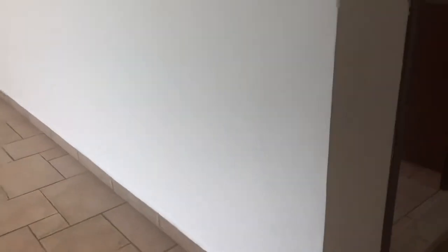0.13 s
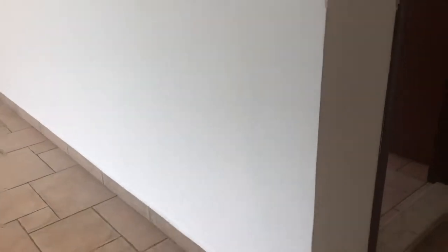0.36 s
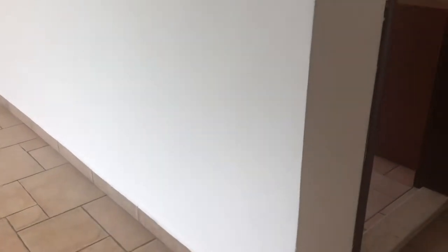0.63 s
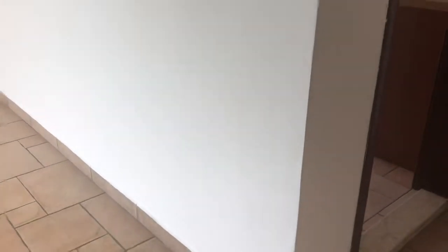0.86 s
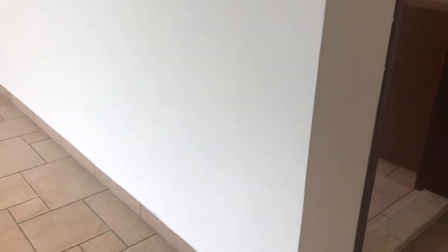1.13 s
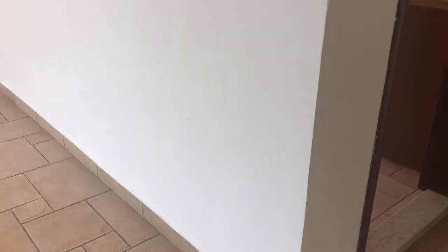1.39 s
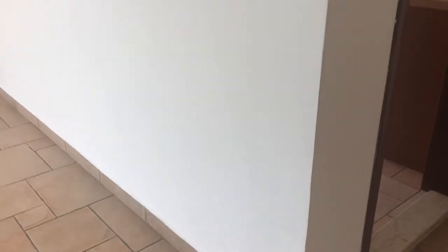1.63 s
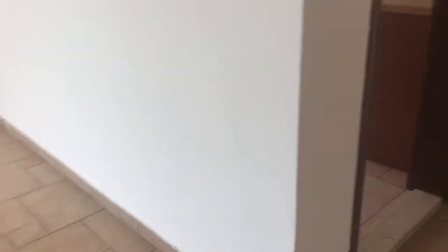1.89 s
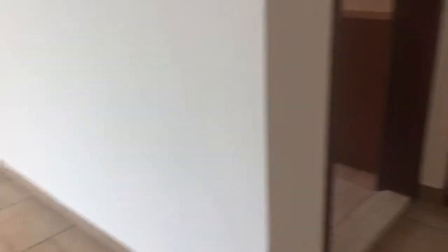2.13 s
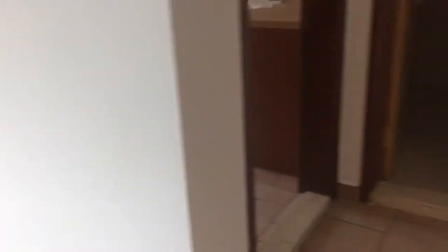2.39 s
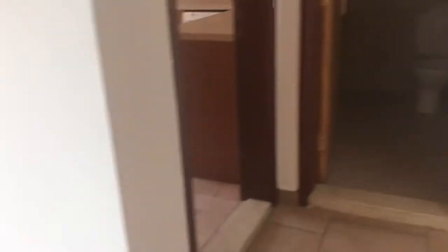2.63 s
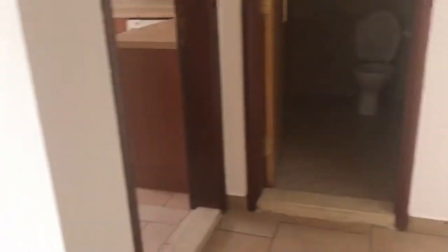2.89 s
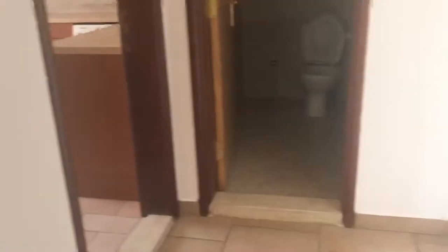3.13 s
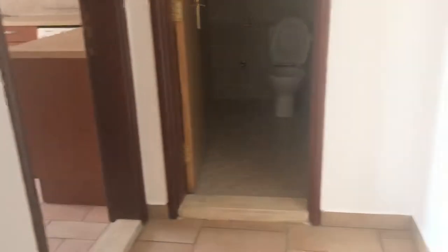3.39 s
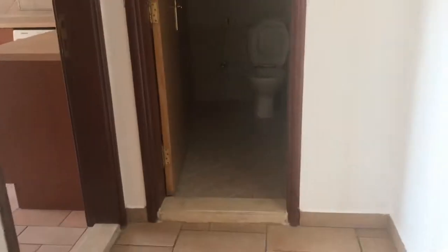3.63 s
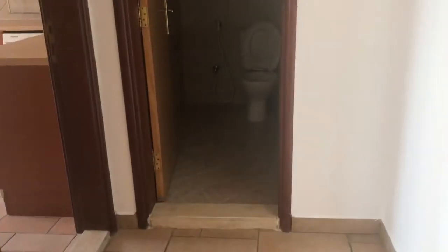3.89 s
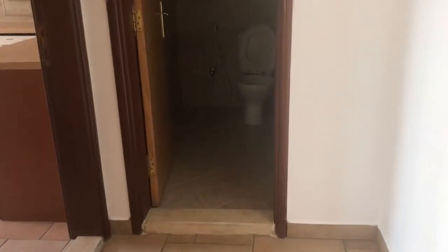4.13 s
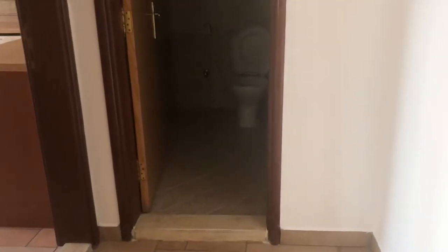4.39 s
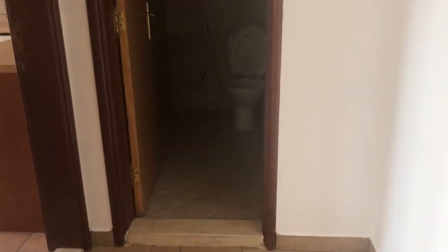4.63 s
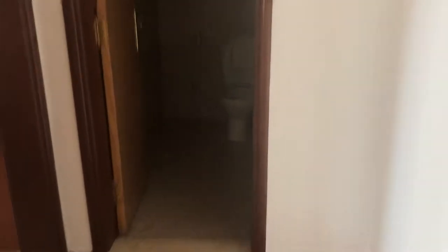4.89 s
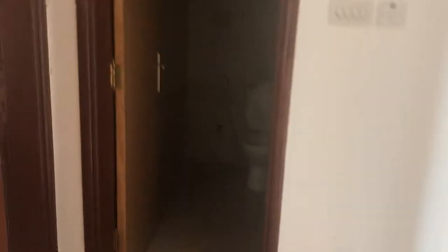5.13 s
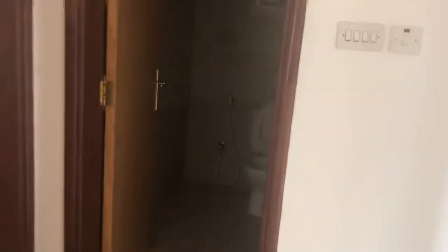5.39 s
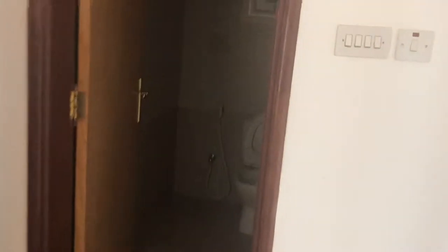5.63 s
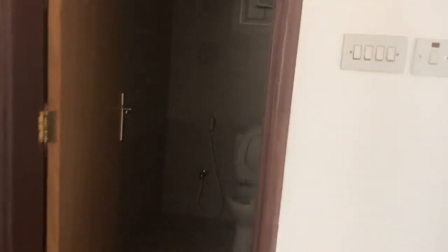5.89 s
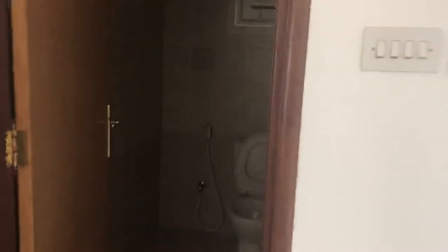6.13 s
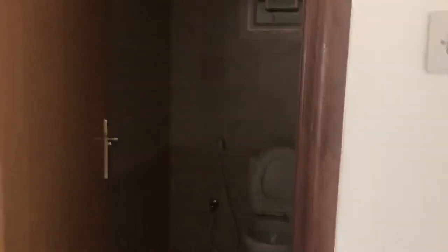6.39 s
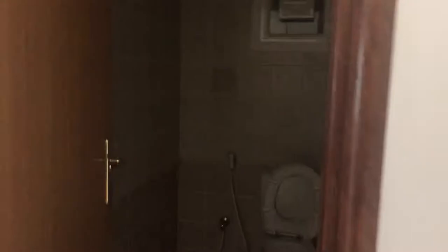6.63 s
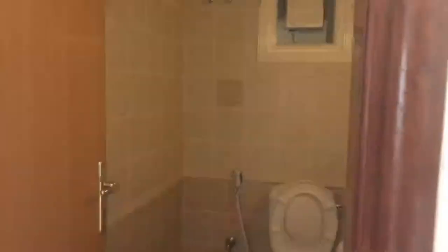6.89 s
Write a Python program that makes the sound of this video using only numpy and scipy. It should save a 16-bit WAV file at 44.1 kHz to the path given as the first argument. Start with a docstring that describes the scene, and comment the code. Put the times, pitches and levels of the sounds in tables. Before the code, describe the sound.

Shoes tap and cloth rustles in an empty tiled apartment; a distant door slams with a booming echo, then a switch snaps loudly close by.

```python
"""Someone walks through an empty tiled apartment, with outdoor noise coming faintly through the walls.
Clothes rustle and shoes tap, a sole drags over tile, and metal clinks: noise grains, short bursts, rings.
A door a few rooms away touches its frame, then slams; panel modes and noisy cracks boom through bare rooms.
A deep rumble of band noise grows, a few more taps, clinks and rustles follow, and a wall switch snaps
close by."""
import sys
import numpy as np
from scipy import signal
from scipy.fft import irfft
from scipy.io import wavfile
from scipy.ndimage import uniform_filter1d

SR = 44100
rng = np.random.default_rng(int(sys.argv[2]) if len(sys.argv) > 2 else 0)


def how_loud(loudness_db):
    """Turn decibels into a plain amplitude multiplier (0 dB gives 1, 20 dB gives 10)."""
    steps = np.asarray(loudness_db, float) / 20
    return 10 ** steps


def inscribe(sig):
    """Save sig as 16-bit PCM at rate SR to the path in sys.argv[1].

    A 1-D sig is mono; a 2-D sig holds one channel per row.
    Samples are clipped to [-1, 1] before scaling.
    """
    pcm = np.round(np.clip(np.atleast_2d(sig).T, -1, 1) * 32767)
    wavfile.write(sys.argv[1], SR, pcm.astype(np.int16))


N = 309582


def evened(x):
    """Scales to rms 1."""
    return x / np.sqrt(np.mean(x ** 2) + 1e-20)


def read(points, hz):
    """Reads a table on a log-frequency axis."""
    f, value = np.transpose(points)
    return np.interp(np.log(hz + 1), np.log(f + 1), value)


def curve(rows):
    """A dB curve as gain over the whole scene, silent outside its span."""
    s, db = np.transpose(rows)
    return how_loud(np.interp(np.arange(N) / SR, s, db, left=-200, right=-200))


def add(mix, s, sound):
    """Mixes a sound in at time s."""
    part = mix[round(s * SR):][:len(sound)]
    part += sound[:len(part)]


def colour(x, spectrum, size=4096):
    """Causal minimum-phase filter with the given spectrum."""
    log_gain = np.log(how_loud(read(spectrum, abs(np.fft.fftfreq(size, 1 / SR)))))
    response = np.fft.ifft(np.exp(np.conj(signal.hilbert(log_gain)))).real[:size // 2]
    return signal.oaconvolve(x, response)[:len(x)]


def resonate(x, hz, width):
    """One resonance of gain 1."""
    pole = np.exp((2j * np.pi * hz - np.pi * width) / SR)
    return 2 * signal.lfilter([1 - abs(pole)], [1, -pole], x).real


def ring(modes, seconds, rise_turns):
    """Dying sines with a short, softened onset, slower for low modes; peak 1."""
    t = np.arange(round(seconds * SR)) / SR
    out = np.zeros(len(t))
    for hz, db, t60 in modes:
        onset = 1 - np.exp(-t * hz / rise_turns)
        out += how_loud(db - 60 * t / t60) * onset * np.sin(2 * np.pi * hz * t)
    return out / abs(out).max()


def puff(t60, size=4096):
    """A sudden noise burst with an even spectrum: each pitch region arrives after its own short delay."""
    spread_s = t60 / np.log(1000)
    region = max(round(.4 * size / SR / spread_s), 1)
    a, b = evened(uniform_filter1d(rng.standard_normal((size // 2 + 1, 2)), region, 0)).T
    delay_s = spread_s * (a ** 2 + b ** 2) / 2
    phase = 2 * np.pi * np.cumsum(delay_s) * SR / size
    return irfft(np.exp(-1j * phase))[:size // 2]


def room(x, decays, seconds, build_ms):
    """Diffuse echoes that build up and die band by band, energy 1."""
    n = round(seconds * SR)
    hz, t, z = signal.stft(rng.standard_normal(n), SR, nperseg=512)
    decay = how_loud(-60 * t / read(decays, hz)[:, None])
    tail = signal.istft(z * decay, SR, nperseg=512)[1][:n]
    tail *= 1 - np.exp(-np.arange(len(tail)) / SR * 1000 / build_ms)
    return signal.oaconvolve(x, tail / np.linalg.norm(tail))[:N]


def strokes(rows, tail_db=-200):
    """Gain of strokes that rise and fall evenly in dB, each with an optional softer, slowly fading tail."""
    tail_db_per_s = 70
    t, out = np.arange(N) / SR, np.zeros(N)
    for s, db, rise, fall in rows:
        late = t - s
        out += how_loud(db - 20 * np.where(late < 0, -late / rise, late / fall))
        out += (late > 0) * how_loud(db + tail_db - tail_db_per_s * abs(late))
    return out


def hum():
    """Outdoor noise through the walls: random short-time spectra with slow patches, and faint narrow bands."""
    # broad noise colour: f/Hz, relative level/dB per Hz
    hum_colour = [(13, -68), (22, -9.5), (97, -3), (229, -3.5), (263, -10), (302, -11), (356, -18),
                  (387, -17.5), (988, -23.5), (1810, -35), (2590, -33.5), (3150, -45.5), (16000, -52.5)]
    # narrow bands: f/Hz, width/Hz, level/dB before the slow fade
    hum_bands = [(2650, 19, -77), (1018, 160, -65.5)]
    # the hum along the walk: t/s, level/dB
    fade = [(0.0, 3.5), (7.02, -3.5)]
    wash_db = -46.5  # rms before the slow fade
    frames, hz = N // 512 + 5, np.fft.rfftfreq(2048, 1 / SR)
    a, b, patches = rng.standard_normal((frames, 1025, 3)).T
    patches = uniform_filter1d(patches, 12, 0)  # smooth across pitch
    patches = evened(uniform_filter1d(patches, 8, 1))  # then across time
    z = (a + 1j * b) * how_loud(read(hum_colour, hz)[:, None] + patches)
    wash = how_loud(wash_db) * evened(signal.istft(z, nperseg=2048, noverlap=1536)[1][:N])
    white = rng.standard_normal(N)
    bands = sum(how_loud(db) * evened(resonate(resonate(white, f, w), f, w)) for f, w, db in hum_bands)
    return (wash + bands) * curve(fade)


def treble_flicker():
    """A faint band of noise at the top of the treble, gated regularly but at uneven levels."""
    tick_hz, width_hz, ticks_per_s = 15500, 1500, 30
    tick_db, spread_db = -74, 3  # noise rms before gating; level spread from tick to tick
    turns = np.arange(N) * ticks_per_s / SR + .2
    levels = how_loud(spread_db * rng.standard_normal(N))
    gate = (turns % 1 < .3) * levels[turns.astype(int)]
    band = resonate(resonate(rng.standard_normal(N), tick_hz, width_hz), tick_hz, width_hz)
    return how_loud(tick_db) * gate * evened(band)


def rumble():
    """A lumpy band of low noise, one narrow resonance passed twice."""
    # deep rumble, growing toward the small room: t/s, level/dB
    growth = [(0, -83), (4, -69), (6.5, -46.5), (7.02, -46.5)]
    return curve(growth) * evened(resonate(resonate(rng.standard_normal(N), 62, 43), 62, 43))


def rustle():
    """Fine grains of cloth under the hand's motion, with a few crackles standing out."""
    # cloth and fingers near the microphone: peak t/s, level/dB, rise/s and fall/s for 20 dB each
    motions = [(.108, -51.5, 0.56, 0.032), (.355, -61.5, .03, 0.077), (1.265, -53, 0.012, 0.16),
               (1.34, -41.5, 0.064, 0.035), (2.154, -58, 0.049, 0.079), (2.274, -47, 0.032, 0.034),
               (2.357, -64, .03, .04), (4.988, -65, 0.3, 0.37), (5.686, -66, 0.024, 0.075),
               (5.79, -67.5, 0.8, 0.27), (5.93, -64.5, 0.24, 0.25), (6.55, -59.5, 0.59, 0.42),
               (6.93, -61, 0.082, 0.4)]
    # cloth colour: f/Hz, relative level/dB per Hz
    cloth = [(880, -68), (1500, 1.5), (3150, -4.5), (11000, -7), (13300, -8), (14800, -5), (16000, -11.5)]
    # single crackles of the cloth: t/s, peak level/dB
    crackles = [(0.014, -36), (.062, -34), (0.103, -34), (1.189, -36), (1.267, -18), (1.318, -34),
                (1.332, -37.5), (1.344, -19), (1.38, -42), (1.519, -33), (6.29, -44), (6.539, -35)]
    grains_per_s = 6000
    tail_db = -14.5  # each stroke leaves a softer, slowly fading tail
    sizes = how_loud(np.minimum(rng.exponential(1, N), 4.5))
    grains = sizes * rng.standard_normal(N) * (rng.random(N) < grains_per_s / SR)
    out = evened(colour(grains, cloth)) * strokes(motions, tail_db)
    for s, db in crackles:
        crackle = np.diff(puff(0.0069), 2)  # differencing brightens it
        add(out, s, how_loud(db) * crackle / abs(crackle).max())
    return out


def taps():
    """Short bursts shaped by two wide resonances; returns the direct sound and what feeds the rooms."""
    # shoe taps and small knocks: t/s, peak level/dB, centre f/Hz
    knocks = [(0.06, -27, 1410), (0.076, -25.5, 626), (.102, -35.5, 3210), (.231, -44, 3800),
              (.398, -35, 630), (.436, -32, 1187), (.437, -29.5, 483), (0.449, -25, 420), (.457, -21, 196),
              (.470, -25.5, 300), (.489, -29, 350.6), (0.739, -50, 3650), (0.926, -42, 3180),
              (1.175, -43, 3084), (1.184, -25, 650), (1.185, -27, 2340), (1.293, -35, 650),
              (2.242, -44.5, 5370), (5.739, -46, 1630), (6.331, -51, 3800), (6.339, -49, 2997),
              (6.38, -35, 884), (6.391, -30.5, 198), (6.469, -40, 1530)]
    t60_s, damping = .026, 0.4025  # burst decay at 1 kHz, shorter as a power of pitch
    room_db, room_db_per_octave = -4, 2.5  # relative send at 1 kHz; brighter taps lie farther off
    direct, send = np.zeros((2, N))
    for s, db, hz in knocks:
        burst = puff(t60_s * (1000 / hz) ** damping)
        tap = resonate(resonate(burst, hz, 0.34 * hz), hz, 4.0 * hz)
        tap *= how_loud(db) / abs(tap).max()
        add(direct, s, tap)
        add(send, s, how_loud(room_db + room_db_per_octave * np.log2(hz / 1000)) * tap)
    return direct, send


def scuff():
    """Dense uneven slips ring the sole and tile."""
    # a sole dragged over tile: peak t/s, relative level/dB, rise/s and fall/s for 20 dB each
    drags = [(1.174, -41.5, 0.002, 0.054), (1.335, -36, 0.15, 0.17)]
    # what the drag rings: f/Hz, width/Hz, relative level/dB
    sole = [(389, 24, 10.5), (650, 37, 11), (1750, 880, 13), (2170, 220, -2), (2700, 450, 4),
            (3800, 690, -5)]
    slips_per_s = 1500
    sizes = how_loud(3.1 * np.minimum(rng.exponential(1, N), 3.5))
    slips = sizes * rng.choice([-1., 1.], N) * (rng.random(N) < slips_per_s / SR)
    body = sum(how_loud(db) * evened(resonate(slips, hz, width)) for hz, width, db in sole)
    return strokes(drags) * evened(body)


def clinks():
    """Each clink is a sharp strike and the ring of one metal piece."""
    # metal clinks: t/s, peak level/dB of the ring, which piece, strike level/dB against the ring
    hits = [(1.519, -65, "tiny", 0), (1.699, -21.5, "large", 1), (2.993, -43, "middle", -9),
            (5.891, -51.5, "small", -9), (5.925, -62, "small", 4), (6.015, -64, "tiny", -4)]
    # modes of each named piece: f/Hz, relative level/dB, t60/s
    pieces = {"large": [(450, -8, .02), (1480, 0, .006), (1933, 0, .006), (2550, -5, .007),
              (2945, -10, .016), (3700, -11, .01), (3980, -10, .016), (6300, -8, .003), (7400, -15, .007),
              (8285, -27, .2), (8220, -20, .05), (14090, -34, .2)], "middle": [(1850, -6, .008),
              (3030, 0, .028), (3779, -3, .006), (5890, -7, .022), (13850, -10, .02)],
              "tiny": [(14100, 0, .06)], "small": [(2800, 0, .02), (8000, -8, .025), (12200, -13, .03),
              (13700, -10, .04)]}
    out = np.zeros(N)
    for s, db, piece, strike_db in hits:
        strike = np.diff(puff(0.0095), 2)  # differencing brightens it
        add(out, s, how_loud(db) * ring(pieces[piece], .6, 0.69))
        add(out, s, how_loud(db + strike_db) * strike / abs(strike).max())
    return out


def door():
    """Each blow rings the panel and gives a crack, brighter for harder contact; returns the two apart."""
    # blows on the frame: t/s, panel relative level/dB, crack relative level/dB, hardness/dB per octave,
    # contact (0 latch side touching, 1 full slam, 2 low thump as the leaf rebounds)
    blows = [(4.2125, -20, -44, 5.5, 0), (4.262, -18, -58, -1, 2), (4.284, -29, -62, 3, 0),
             (4.499, -11.5, -36.5, -2.5, 1), (4.509, -12.5, -40, 6.5, 1), (4.521, -8, -50, 6.5, 1),
             (4.543, -19, -42.5, 6, 1), (4.553, -14.5, -37.5, -2, 1), (4.557, -7, -38, -2, 2),
             (4.574, -13, -37, -2, 1)]
    # panel and the lowest air modes it drives, one list per contact: f/Hz, relative level/dB, t60/s
    panel_modes = [
        [(175.6, -10.5, 1), (285.6, 5, 0.32), (331, -2, 0.15), (90, -7, .5), (687, -13, 0.31)],
        [(48, -7, 0.75), (61, 6.5, 0.22), (83.8, 9, 0.11), (100.5, -4, 0.72), (158.4, 8, 0.44), (196, 3, 0.17),
         (229, -0.5, 0.34), (313.4, -1.5, 0.18), (376, -16.5, 0.97), (482.6, -23.5, 0.29), (599, -7, 0.36),
         (677, -26, 0.21)],
        [(47.84, -16.5, 0.57), (88, -1.5, 0.13), (102.24, -5, 0.39), (162, -6.5, 0.24), (286.3, -13, 0.15)],
    ]
    # wood and latch meeting: f/Hz, relative level/dB per Hz
    crack_colour = [(60, -44), (120, -13.5), (300, -13.5), (600, -11), (1000, -18), (2200, -29),
                    (5000, -42.5), (9000, -52.5), (16000, -67)]
    smear_s = .012  # the edge meets the frame bit by bit, softening the start
    panel_lag_s = 0.00487  # the panel answers just after
    boom, cracks = np.zeros((2, N))
    panels = [ring(modes, 2.5, 0.19) for modes in panel_modes]
    for s, panel_db, crack_db, hardness, contact in blows:
        tilted = [(hz, db + hardness * np.log2(hz / 1000)) for hz, db in crack_colour]
        crack = colour(signal.oaconvolve(puff(0.0202), puff(smear_s)), tilted)
        add(boom, s + panel_lag_s, how_loud(panel_db) * panels[contact])
        add(cracks, s, how_loud(crack_db) * evened(crack))
    return boom, cracks


def switch():
    """Hard plastic snaps: coloured noise bursts with very short decays."""
    # the rocker snapping over and rebounding: t/s, peak level/dB, burst t60/s
    snaps = [(6.9747, 2.5, 0.0047), (6.975, -4, .005), (6.98, -13, .016)]
    # rocker colour: f/Hz, relative level/dB per Hz
    rocker = [(120, -31), (200, -25), (860, 2), (2460, -9.5), (3020, 6), (3700, 1), (4620, 4), (8030, -0.5),
              (9140, 4), (10400, 0), (12300, 4.5), (15300, 0), (16500, -9.5)]
    out = np.zeros(N)
    for s, db, t60 in snaps:
        snap = colour(puff(t60), rocker)
        add(out, s, how_loud(db) * snap / abs(snap).max())
    return out


def scene():
    """Rustle, hum, flicker and rumble stay dry; the others feed a near room and, except the switch, far rooms."""
    # decay of the near room: f/Hz, t60/s
    near_decays = [(60, 0.33), (250, 0.9), (1000, 0.4), (4000, 0.33), (8000, 0.23), (16000, 0.066)]
    # decay of the far rooms: f/Hz, t60/s
    far_decays = [(50, 4.46), (130, 1.7), (350, 3.1), (920, 3.19), (2430, 2.3), (6400, 1.2), (13000, 0.49)]
    tap, tap_send = taps()
    drag, metal = scuff(), clinks()
    boom, crack = door()
    snap = switch()
    direct = rustle() + tap + how_loud(1.5) * drag + metal + boom + how_loud(5.5) * crack + snap
    near = tap_send + how_loud(-10.5) * drag + how_loud(4.0) * metal
    near += how_loud(-16.5) * boom + how_loud(6.5) * crack + how_loud(-9.5) * snap
    far = how_loud(-0.5) * tap_send + how_loud(-7.5) * drag + how_loud(-0.5) * metal
    far += how_loud(-10.5) * boom + how_loud(2.5) * crack
    echoes = room(near, near_decays, 1.2, 1.0) + room(far, far_decays, 3.0, 29.0)
    return (direct + echoes + hum() + treble_flicker() + rumble())[None]


def roll_off(x):
    """The treble ends steeply here."""
    return signal.sosfilt(signal.butter(12, 16860, fs=SR, output="sos"), x)


def record(dry):
    """The phone's microphone thins the deepest bass, ripples the treble and clips loud peaks softly."""
    # microphone response: f/Hz, level/dB
    microphone = [(20, -1), (4300, 2), (5000, -1.5), (6500, 2), (7800, -3.5), (9100, 0.5), (10500, -4.5),
                  (12500, -0.5), (15900, -6), (16400, -35), (17200, -58)]
    cut = signal.sosfilt(signal.butter(2, 25, "highpass", fs=SR, output="sos"), dry[0])
    heard = colour(cut, microphone, size=1024)
    heard = heard / (1 + abs(heard / .97) ** 6) ** (1 / 6)  # peaks bend toward 0.97
    return roll_off(heard[None])


dry = scene()
out = record(dry)
inscribe(out)
```